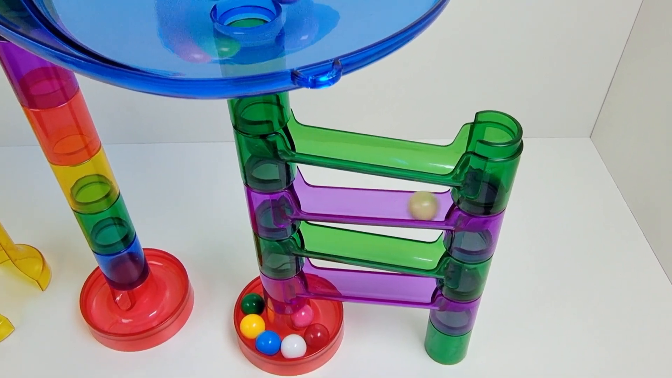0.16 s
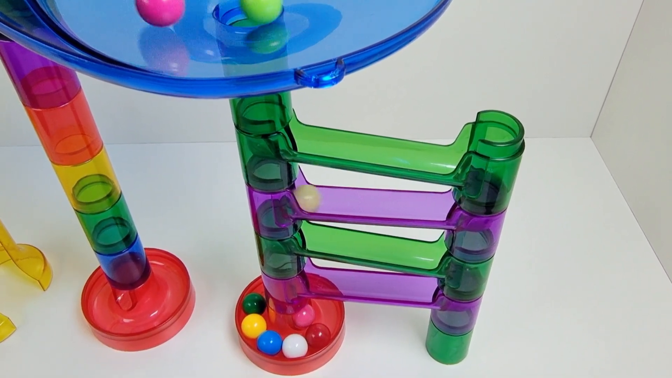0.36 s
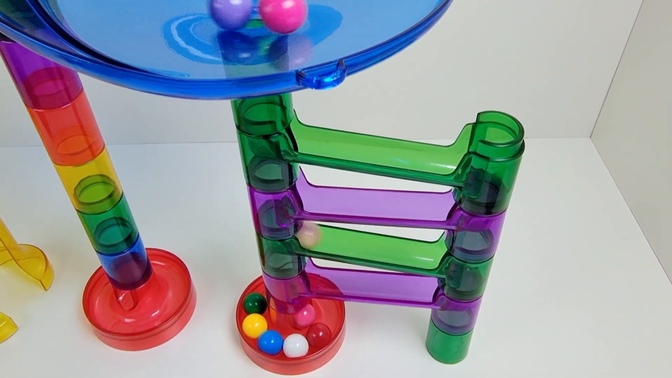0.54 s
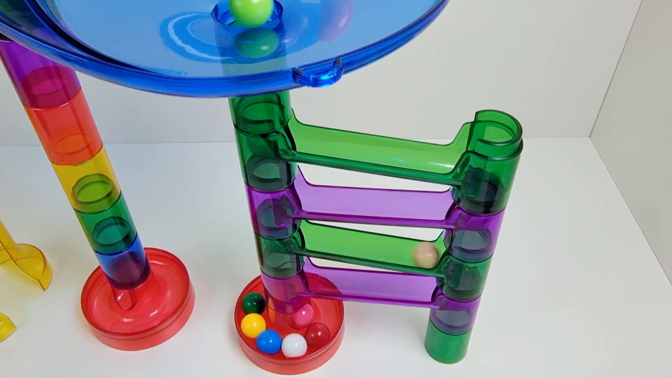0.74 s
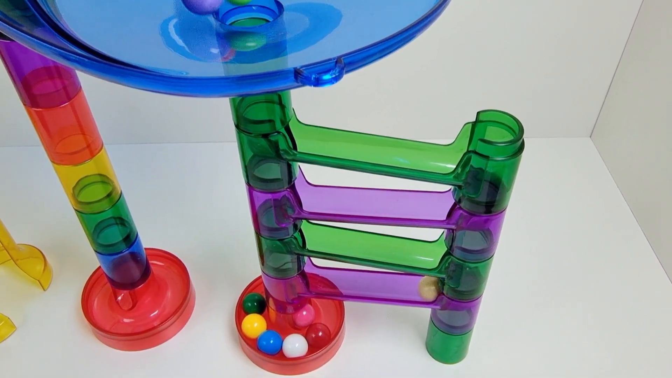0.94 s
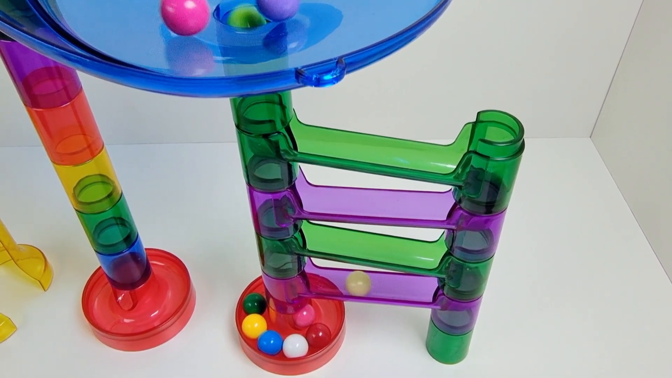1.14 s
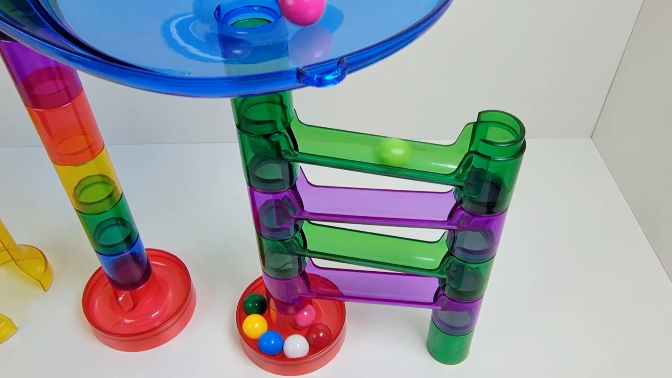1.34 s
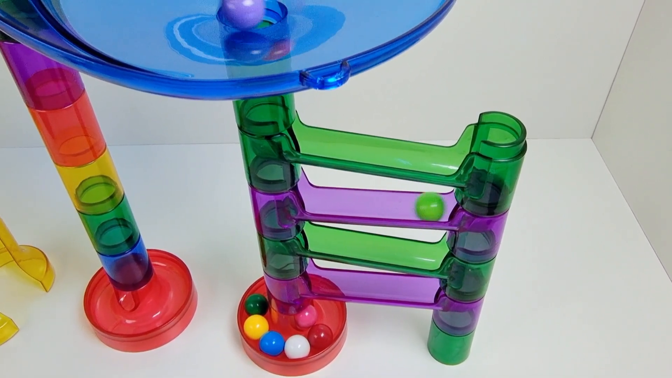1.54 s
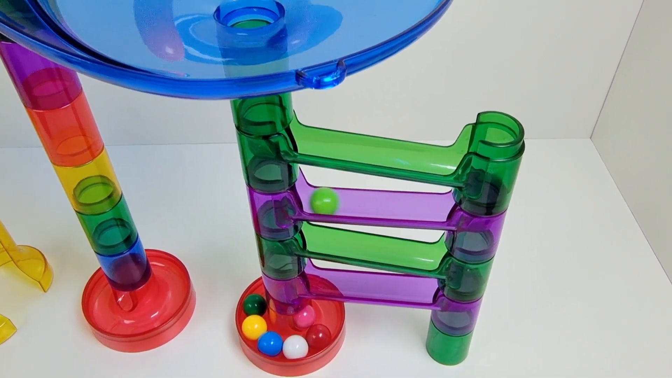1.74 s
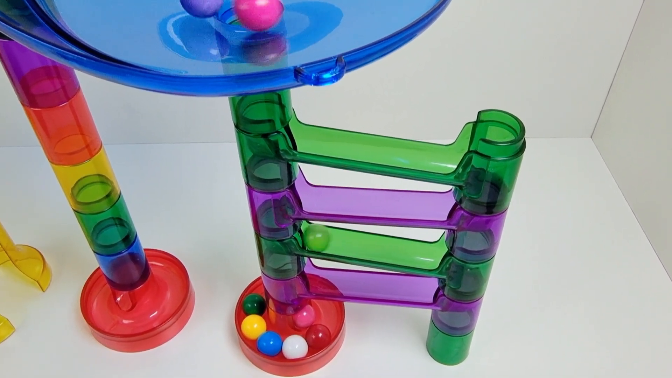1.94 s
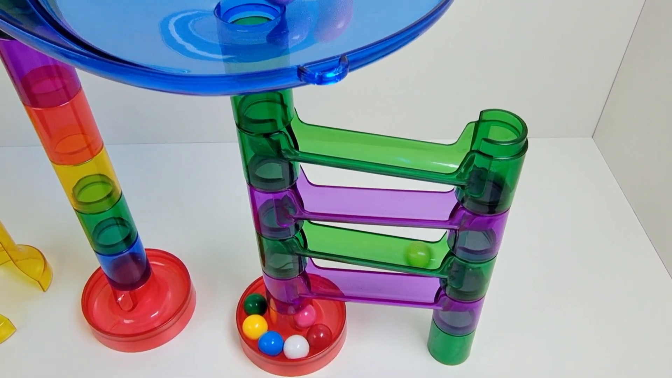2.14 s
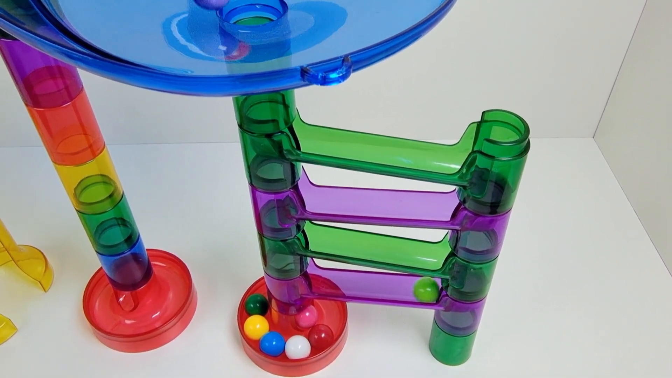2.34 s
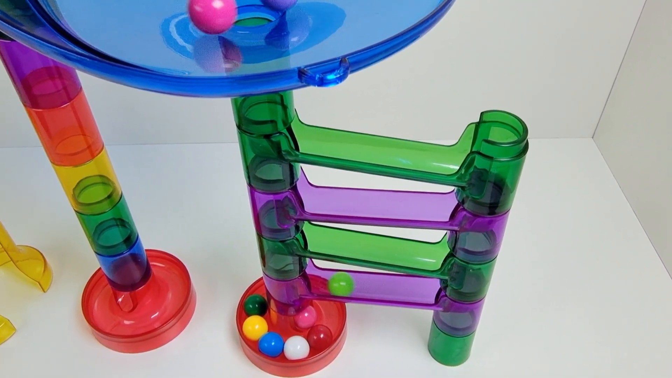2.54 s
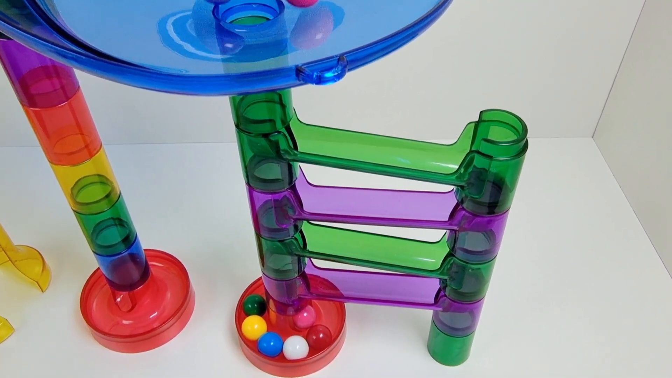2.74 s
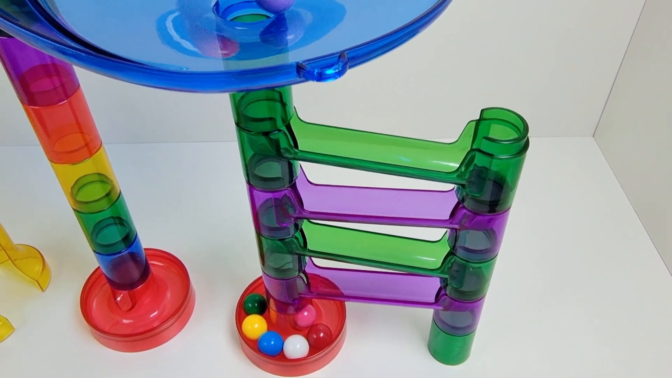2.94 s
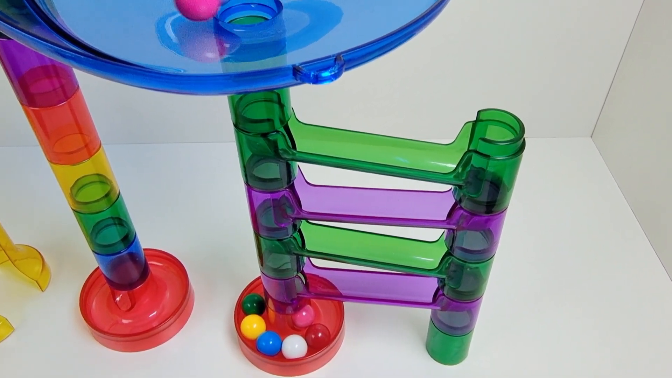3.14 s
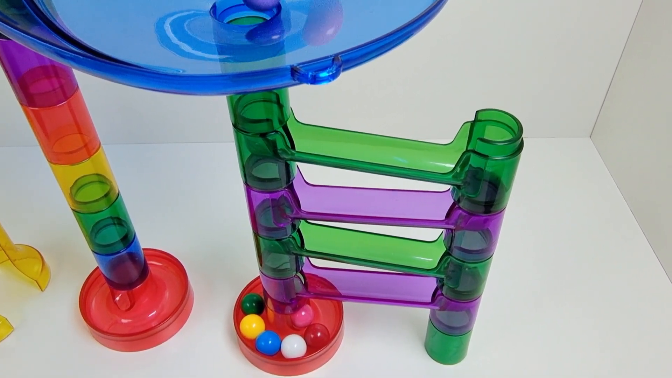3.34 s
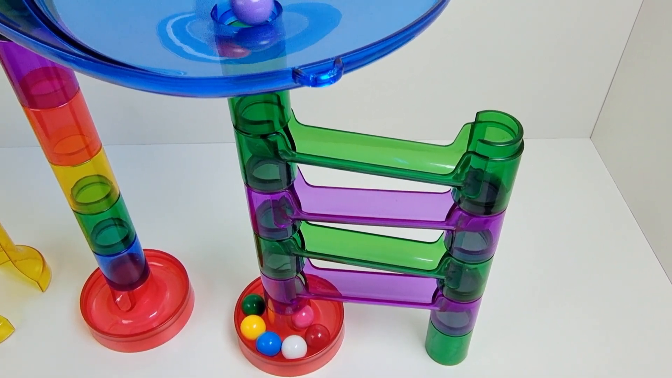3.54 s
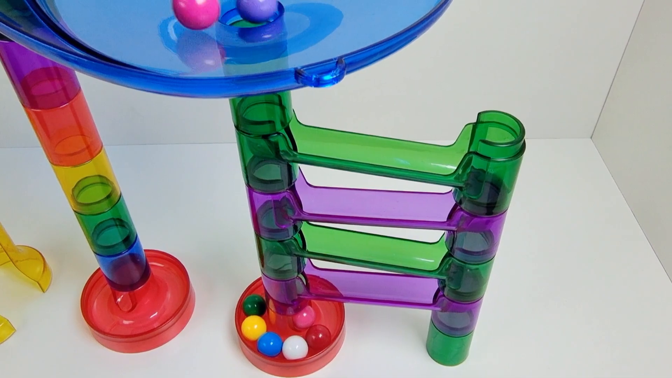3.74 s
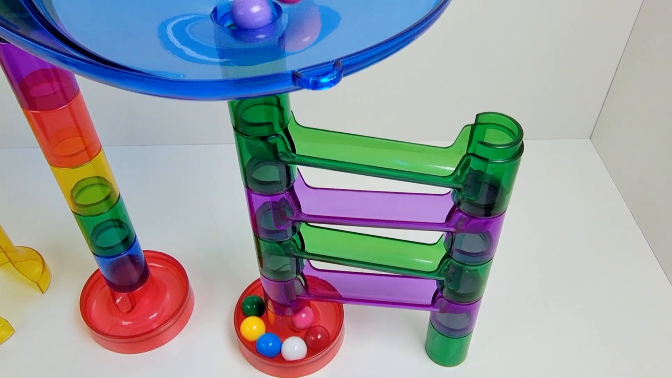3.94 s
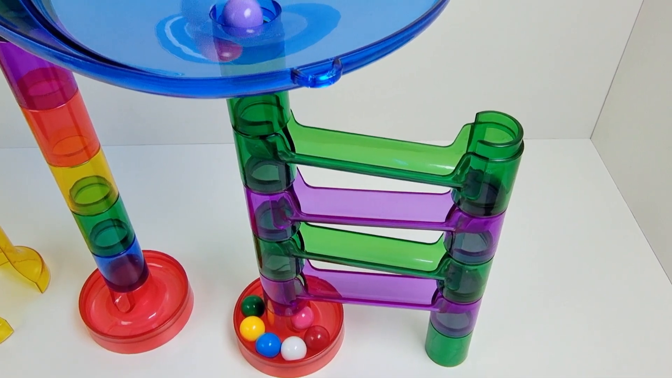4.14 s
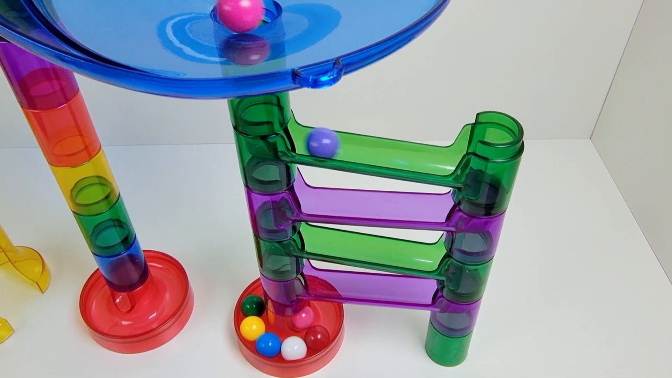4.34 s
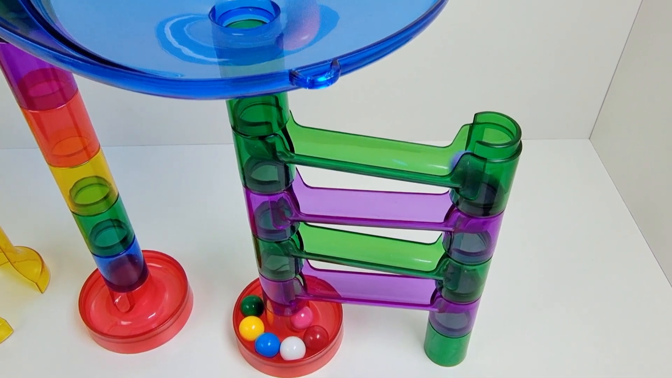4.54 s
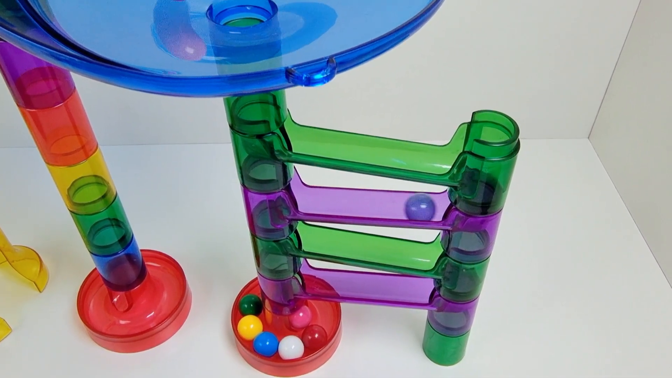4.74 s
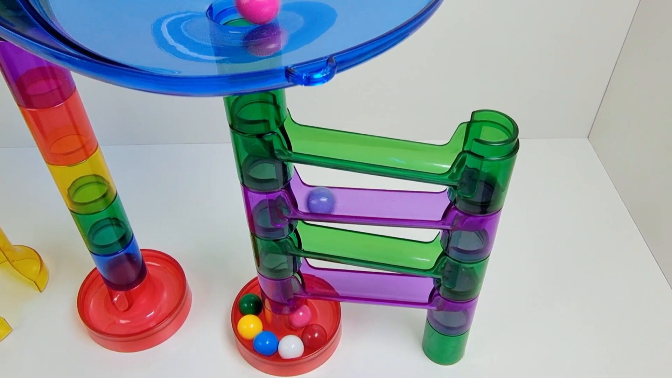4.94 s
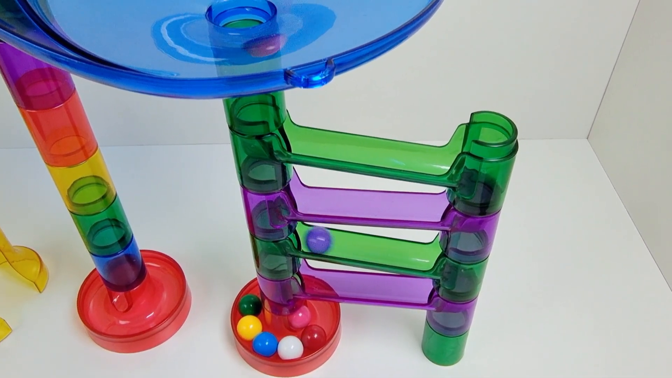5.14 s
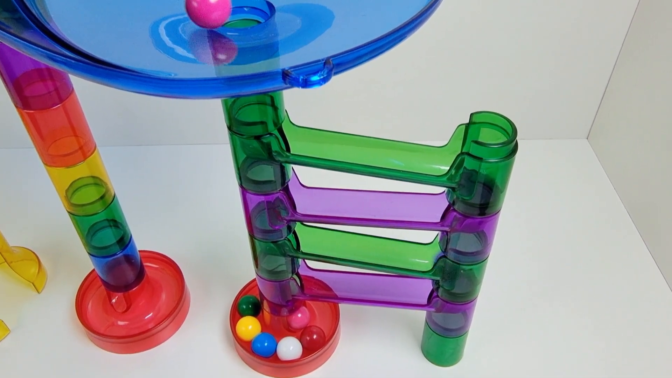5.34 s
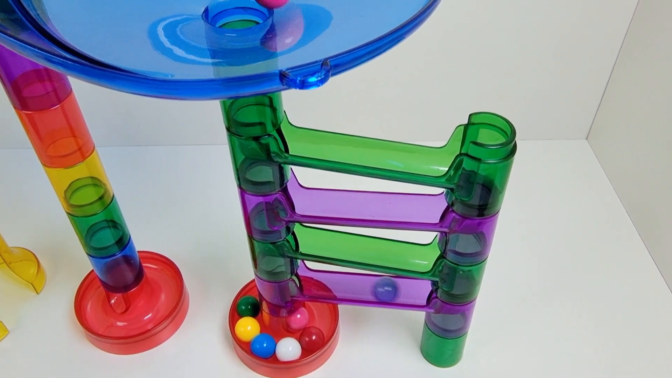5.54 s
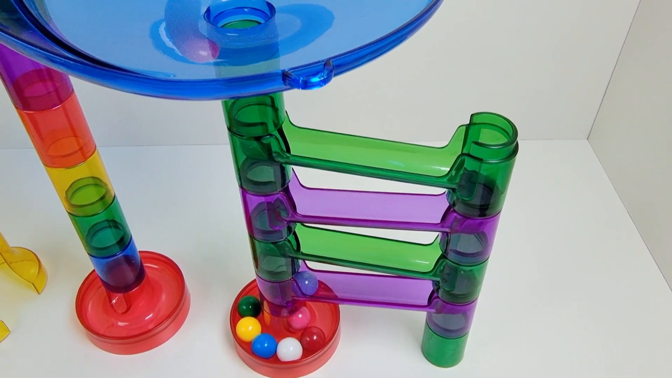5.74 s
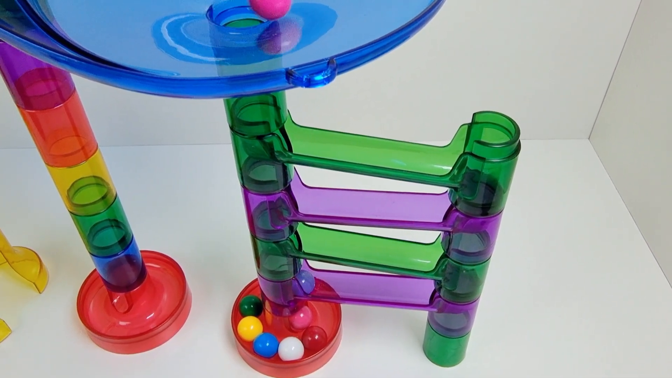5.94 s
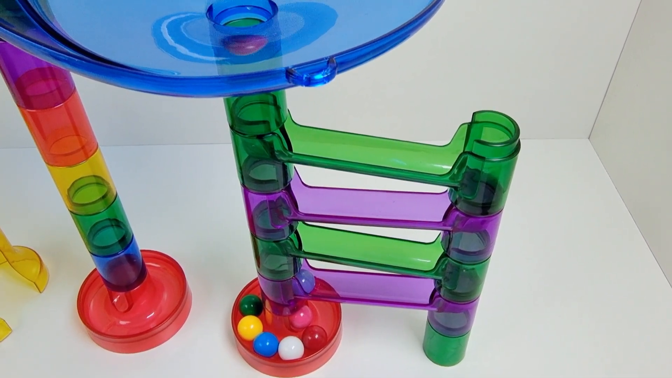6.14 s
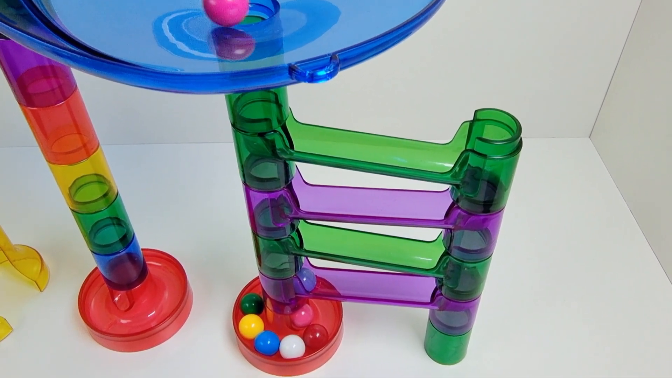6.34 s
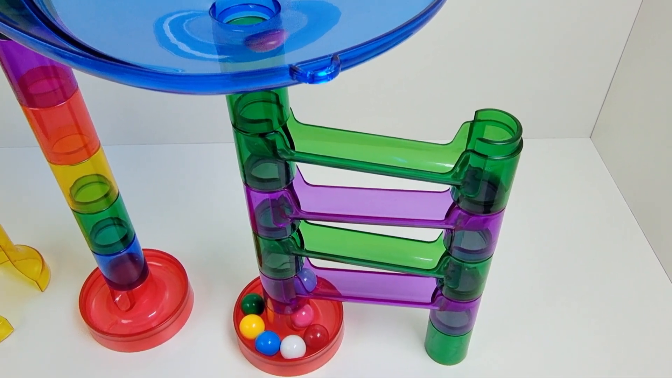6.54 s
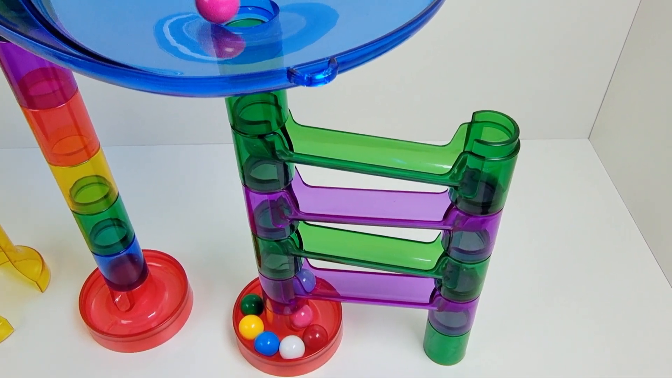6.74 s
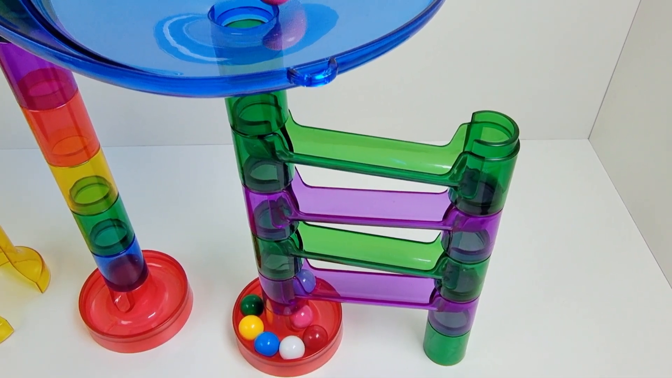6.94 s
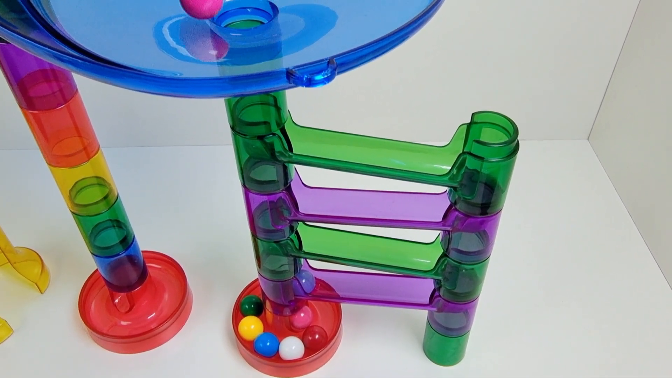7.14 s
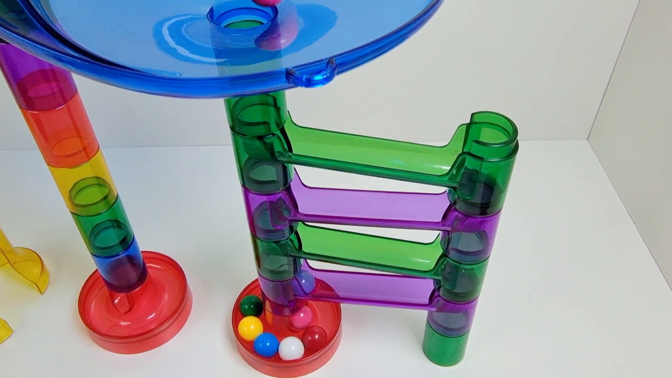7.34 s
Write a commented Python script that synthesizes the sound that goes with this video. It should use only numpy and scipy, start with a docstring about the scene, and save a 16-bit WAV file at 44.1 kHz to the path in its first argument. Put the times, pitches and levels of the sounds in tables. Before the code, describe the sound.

Small hard balls clatter down a plastic toy track from the very start, close by in a small room. Until about 3 seconds, sharp clicks and hollow knocks come in quick bunches, roughly every 0.4 seconds, with rattling and light thumps through the table. Underneath, balls circle a plastic funnel with a soft whirr that swells and sinks. From 3 to about 4.2 seconds the clatter eases, leaving the rolling, light ticks as balls skip over seams, and a couple of small knocks. A second run of clicks and rattles goes down the tubes and ramps from about 4.2 to 5.9 seconds, ending in two soft taps around 6 seconds. After that the funnel whirr turns faint and uneven, with scattered little ticks until about 7.5 seconds. The near walls add a short, dull echo, and a faint low room rumble stays throughout.

```python
"""A table top in a small bare room, two microphones close by. Small hard balls circle a plastic funnel,
drop down tubes and knock along zigzag ramps. Each knock rings the plastic track and thumps the table;
tumbling and rolling balls rattle the same modes. In the funnel, balls whirr over mould marks and skip
on seams, ringing the dish. Near walls add a short, dull tail over the room's low rumble."""
import sys
import numpy as np
from scipy import signal
from scipy.fft import rfft, irfft, next_fast_len
from scipy.io import wavfile
from scipy.ndimage import uniform_filter1d

SR = 44100
rng = np.random.default_rng(int(sys.argv[2]) if len(sys.argv) > 2 else 0)


def materialize(psi):
    """Save the field psi as 16-bit PCM at rate SR to the path in sys.argv[1].

    A 1-D psi becomes a single channel; in a 2-D psi each row is a channel.
    """
    bounded = np.clip(np.atleast_2d(psi).T, -1, 1)
    quanta = np.round(bounded * 32767).astype(np.int16)
    wavfile.write(sys.argv[1], SR, quanta)


N = 330309


def undb(db):
    """Decibels to gain."""
    return 10 ** (np.asarray(db) / 20)


def ring(x, hz, db, t60_s):
    """One decaying mode that radiates nothing far below its pitch."""
    r, w = np.exp(-np.log(1000) / (t60_s * SR)), 2 * np.pi * hz / SR
    return signal.lfilter(undb(db) / 2 * np.array([1, 0, -1]), [1, -2 * r * np.cos(w), r * r], x)


def stereo(three, hz, split_hz=380):
    """Left and right from one common and two private signals: bass shared, treble not."""
    common = 1 / (1 + (hz / split_hz) ** 6)
    return np.sqrt(common) * three[0] + np.sqrt(1 - common) * three[1:]


def grit(per_s, spread_db):
    """Tiny random impacts, many small, few large; three signals with the same timing, rms 1."""
    sizes = (rng.random(N) < per_s / SR) * undb(spread_db * rng.exponential(size=N))
    x = sizes * rng.standard_normal((3, N))
    return x / np.sqrt(np.mean(x ** 2))


def flutter(rate_hz):
    """Random levels joined by straight ramps."""
    step = int(SR / rate_hz)
    return 2 * uniform_filter1d(np.repeat(rng.standard_normal(N // step + 1), step), step)[:N]


# Tumbles. Each row: start in seconds, length in seconds, rattle in dB, table shake in dB.
TUMBLES = [(-0.05, 0.035, -30, -38.5), (0.182, 0.12, -32.5, -36.5), (0.579, .13, -31.5, -37),
           (0.956, 0.17, -38, -36.5), (1.166, 0.4, -36, -42), (1.365, 0.12, -42, -36),
           (1.589, 0.12, -36.5, -32), (1.988, 0.059, -26, -38), (2.397, 0.097, -35, -39),
           (2.794, 0.028, -38.5, -46), (3.855, 0.069, -41, -47), (4.06, .14, -51.5, -53),
           (4.19, 0.13, -40, -43.5), (4.386, 0.093, -31, -40), (4.719, .14, -36, -32.5),
           (5.189, 0.14, -39, -41), (5.512, 0.18, -47, -37), (5.818, 0.032, -35.5, -48)]


def tumbling(t, attack_s=0.0062):
    """Rattle and shake power of balls tumbling down tubes and ramps: quick rise, hold, fade."""
    start_s, length_s, rattle_db, shake_db = np.transpose(TUMBLES)[:, :, None]
    rise = np.clip((t - start_s) / attack_s, 0, 1)
    after_s = np.maximum(t - start_s - length_s, 0)
    rattle = rise * undb(rattle_db - 194.5 * after_s)
    shake = rise * undb(shake_db - 166 * after_s)
    return np.sum(rattle ** 2, axis=0), np.sum(shake ** 2, axis=0)


# Rolling in the funnel, swelling as balls come round. Each row: time in seconds, level in dB.
ROLLING = [(0, -41), (.15, -44), (.55, -40.5), (.82, -41.5), (1.2, -38.5), (1.8, -44), (1.95, -40.5),
           (2.3, -43.5), (2.7, -43.5), (2.8, -40.5), (3.0, -44.5), (3.08, -50.5), (3.15, -43), (3.25, -50),
           (3.55, -45), (3.68, -46.5), (3.75, -46), (3.85, -45), (3.95, -40.5), (4.3, -44.5), (4.7, -43),
           (5.15, -45.5), (5.47, -41), (5.52, -44), (5.8, -46.5), (6.07, -49.5), (6.18, -54.5),
           (6.37, -47.5), (6.5, -69), (6.66, -48), (6.76, -60), (6.86, -55.5), (7.04, -65.5), (7.13, -47.5),
           (7.2, -56.5), (7.27, -60), (7.34, -62), (7.49, -50)]


def ball_motion():
    """Rattle, whirr and table shake in dB: livelier rolling raises all three, tumbles add to them."""
    t = np.arange(0, N / SR + .01, .002)
    roll_db = np.interp(t, *np.transpose(ROLLING))
    tumble_rattle, tumble_shake = tumbling(t)
    rattle = tumble_rattle + undb(-57 + 1.6 * (roll_db + 43)) ** 2
    whirr = tumble_rattle * undb(0.5) ** 2 + undb(roll_db) ** 2
    shake = tumble_shake + undb(-54.5 + 1.3 * (roll_db + 43)) ** 2
    return [np.interp(np.arange(N) / SR, t, 10 * np.log10(power)) for power in (rattle, whirr, shake)]


# Modes of the funnel dish. Each row: frequency in Hz, gain in dB, T60 in seconds.
FUNNEL_MODES = [(190, -17, 0.054), (354, -14.5, 0.012), (623.2, -9, 0.082), (806, 1, 0.0049),
                (1173, -3.5, 0.022), (1430, -8, 0.037), (1481, -0.5, 0.023), (1574, -3, 0.072),
                (1666, -5, .1), (1801, -10, 0.08), (2100, -20, 0.021), (2470, -10, 0.012), (2900, -8, .008),
                (3380, -12, .007), (4130, -26, 0.008), (5000, -26, .015)]


def funnel(whirr_db, smooth_limit_db=-37):
    """Balls whirr over mould marks and skip on seams; both drive the modes of the dish."""
    whirr_db = np.minimum(whirr_db, smooth_limit_db)
    marks = signal.lfilter(*signal.butter(4, 3800, fs=SR), grit(per_s=5000, spread_db=0.73))
    marks *= undb(1.7 * flutter(70) + whirr_db - 24.5)
    brightness = undb(0.79 * (whirr_db + 40))  # a livelier ball scrapes brighter
    skips = seam_skips()
    soft = signal.lfilter(*signal.butter(4, 2400, fs=SR), marks + skips)
    sharp = marks * brightness + skips * undb(4)
    return sum(ring(stereo(sharp if hz > 2300 else soft, hz), hz, db, t60_s)
               for hz, db, t60_s in FUNNEL_MODES)


# Spectrum of the still room. Each row: frequency in Hz, relative density in dB.
RUMBLE_SPECTRUM = [(20, -25.5), (40, -3.5), (58, 6.5), (80, -10), (200, -27), (600, -20), (1600, -18.5),
                   (4000, -50.5), (16000, -70.5)]


def room_rumble(rms_db=-64.5):
    """Steady low noise of the still room."""
    hz = np.maximum(np.fft.rfftfreq(N, 1 / SR), 1)
    point_hz, point_db = np.transpose(RUMBLE_SPECTRUM)
    gain = undb(np.interp(np.log(hz), np.log(point_hz), point_db))
    x = irfft(stereo(rfft(rng.standard_normal((3, N))), hz) * gain, N)
    return x * undb(rms_db) / np.sqrt(np.mean(x ** 2))


def bands(hz):
    """Whether a mode counts as low thump, hollow tube ring or hard contact."""
    return hz < 700, 700 <= hz < 2350, hz > 4800


# Modes of table, tubes and ramps. Each row: frequency in Hz, gain in dB, uncapped T60 in seconds.
TRACK_MODES = [(114.8, -14, 0.12), (164.2, -16, .15), (194.4, -18, 0.13), (257, -17, 0.05),
               (386, -2, 0.014), (531, -6, 0.04), (910, -2.5, 0.0076), (1241.5, -11.5, 0.053),
               (1358, -2.5, 0.02), (1616, 3.5, 0.026), (1630, -8.5, 0.02), (1844, -3.5, 0.039),
               (2055, 3.5, 0.016), (2254, -0.5, 0.015), (2580, -7.5, 0.084), (2736, 5.5, 0.01),
               (2977, 4, 0.0077), (3340, 5.5, 0.0073), (3723, -1, 0.011), (3987, -0.5, 0.017),
               (4442, 1.5, 0.019), (4990, -11, 0.012), (5510, -7.5, 0.0041), (6100, -25, 0.019),
               (7000, -20.5, 0.015), (7500, -26, 0.0033), (10200, -37.5, 0.0036), (12040, -19, 0.0018),
               (13600, -21.5, .003), (14300, -21, .005)]


def track(rattle_db, shake_db, table_below_hz=330, ramp_cycles=50):
    """Rattle and knocks ring one set of modes in the table and the plastic track."""
    loose = loose_joints()
    on_table = np.sqrt(undb(shake_db - 19.5) ** 2 + loose * undb(-56.5))
    on_track = np.sqrt(undb(rattle_db - 36) ** 2 + loose * undb(-50.5))
    rattle = grit(per_s=4000, spread_db=0.71)
    on_track *= undb(2.5 * flutter(120))  # the rattle comes in quick bunches
    out = 0
    for (hz, db, t60_s), blows in zip(TRACK_MODES, knocks()):
        low, tube, hard = bands(hz)
        soft_db = -5 if tube or hard else 0  # small bounces favour the middle modes
        rattle_gain = on_table if hz < table_below_hz else on_track * undb(soft_db)
        if not (low or tube):
            t60_s = min(t60_s, ramp_cycles / hz)  # thin ramps soak up the ring
        out += ring(stereo(rattle, hz) * rattle_gain + blows, hz, db, t60_s)
    return out


# Knocks on the track. Each row: start in seconds, blow in dB, hollow tube ring in dB, hard contact in dB.
KNOCKS = [(0.0398, -45, 8, -5), (0.1904, -7.5, -6.5, -2), (0.208, -30, -4, 21), (0.2202, -20.5, -9, 10),
          (0.2319, -16, -11, 5), (0.26, -17, -1.5, 4), (0.3, -23.5, -13, 5.5), (0.3391, -22, -3, 9.5),
          (0.462, -44, 13, -14), (0.5863, -7.5, -9.5, 3), (0.605, -26.5, 7.5, 10.5),
          (0.635, -32.5, 7, 10.5), (0.6727, -17.5, 6.5, 9), (0.7118, -28, 6.5, 7), (0.7494, -21.5, 2, 13.5),
          (0.963, -7, -7.5, 1.5), (1.0293, -9, -8.5, -13.5), (1.0494, -27, 1.5, 1), (1.0591, -16.5, -3, 4),
          (1.107, -14, -12, 3.5), (1.1424, -23, -1.5, 10), (1.1856, -29, 0, 2), (1.2014, -27.5, -3, -10),
          (1.2211, -29, -8, -8.5), (1.2812, -31.5, 2, 10), (1.3087, -24.5, 1.5, 13.5),
          (1.321, -28.5, -11, -5), (1.3431, -27, -2, 13), (1.3612, -17, 1, 0.5), (1.3698, -7, -15.5, 8),
          (1.3958, -15, 4.5, 10.5), (1.4464, -12.5, 4, 8), (1.4616, -10, -16.5, 3),
          (1.473, -23.5, 7.5, -4.5), (1.5088, -14.5, 1, 16.5), (1.5937, -10, -3, 6), (1.6417, -7, -10, 1.5),
          (1.653, -14.5, -0.5, -8), (1.668, -12.5, -12, 9), (1.705, -27, 0, 12), (1.9481, -36, 1, 5),
          (1.9903, -8, -9, -0.5), (2.005, -25, 3.5, 4), (2.0185, -25, -4, 19), (2.0508, -16.5, 3.5, 5),
          (2.0856, -30, -10.5, 14.5), (2.1268, -19.5, 1, 10), (2.267, -41, -1, 2), (2.323, -46.5, -2, 18),
          (2.356, -40, 0, 5), (2.388, -7, -10.5, -3), (2.415, -23, 0, 7), (2.4381, -14, -3, 4),
          (2.4849, -14.5, -8, 8), (2.52, -21.5, 0.5, 9), (2.5873, -33.5, -12, 5), (2.703, -41.5, 5, 6),
          (2.801, -16.5, -3, 8), (2.8253, -16, -1.5, 8), (2.8676, -38, 6, -1), (2.9638, -33, -4, 8),
          (3.0025, -34, 4.5, 9), (3.4202, -50, 7, 15), (3.876, -29, -0.5, 0), (3.9488, -36.5, -3.5, -4),
          (4.1953, -40.5, 4.5, -5), (4.2272, -32.5, -5, -13.5), (4.2704, -34, 1, -3.5),
          (4.3212, -32, -4, 14), (4.3345, -26.5, -2, 12), (4.358, -23.5, 0, 10), (4.382, -12.5, -1.5, 5),
          (4.392, -5, -14.5, 5.5), (4.4035, -28, 15, 18.5), (4.425, -18, -4.5, 9), (4.472, -21, 3, 14),
          (4.5067, -20, 2, 12), (4.7266, -8, -5, -4.5), (4.7709, -15, -14, 5), (4.7877, -22, -12, 6.5),
          (4.806, -13.5, -5.5, 2.5), (4.8431, -16, -21, 9.5), (4.869, -23, 0, 7), (5.1096, -43, 0, -11),
          (5.1968, -8, -7, 6), (5.2108, -31, 3, 2), (5.2234, -24, -4, 7), (5.2495, -17.5, 5, 6),
          (5.2844, -17.5, 3.5, 9.5), (5.3142, -23.5, -3.5, 9.5), (5.5267, -7.5, -14, -3.5),
          (5.544, -22.5, 2.5, 13), (5.5809, -17, -11, -3), (5.6182, -15, -1.5, -6), (5.657, -22.5, -4, 7),
          (5.699, -30, -5.5, 0), (5.73, -36, 6, 2), (5.757, -36.5, 0, 10), (5.8279, -21, -1.5, 14),
          (5.8413, -28, 5.5, 8), (5.8596, -14, -5, 1.5), (5.903, -27.5, -2.5, -7), (6.0005, -34.5, 0, -15),
          (6.0377, -30.5, 0, -12), (7.4456, -42, 4, -9)]


def knocks(samples=600):
    """A ball chatters on the wall, longer for a softer blow. Yields the drive of each track mode."""
    start_s, blow_db, hollow_db, bright_db = np.transpose(KNOCKS)
    thump_db = -21 - 0.37 * blow_db  # hard hits are mostly click
    t = np.arange(samples) / SR
    at = np.minimum((start_s * SR).astype(int)[:, None] + np.arange(samples), N - 1)
    chatter_ms = np.clip(1.2 - .04 * blow_db, .4, 5)[:, None]
    short = (1 - np.exp(-t / 0.00044)) * np.exp(-1000 * t / chatter_ms)
    short /= np.sqrt(np.sum(short ** 2, axis=1, keepdims=True))
    long = np.sqrt(short / np.sum(short, axis=1, keepdims=True))  # decays half as fast
    fizz = long * rng.standard_normal((3, len(KNOCKS), samples))
    pan_db = 0.5 * rng.standard_normal((len(KNOCKS), 1))
    pan = undb(np.array([pan_db, -pan_db]) / 2)
    for hz, _, _ in TRACK_MODES:
        low, tube, hard = bands(hz)
        # each blow lands elsewhere and weights the modes anew
        scatter_db = (1.2 if low else 3.0) * rng.standard_normal(len(KNOCKS))
        colour_db = low * thump_db + tube * hollow_db + hard * bright_db + scatter_db
        # a mode takes the chatter at its own pitch; the crowded treble takes noise
        tone = 0.13 * np.cos(2 * np.pi * (hz * t + rng.standard_normal((3, len(KNOCKS), 1))))
        contact = fizz if hard else (1.2 * long if low else short) * tone
        drive = np.zeros((2, N))
        drive[:, at] = stereo(contact, hz) * pan * undb(blow_db + colour_db - 1)[:, None]
        yield drive


def loose_joints(decay_s=0.0097):
    """Power of the rattle left in the track's loose joints after each knock."""
    start_s, blow_db = np.transpose(KNOCKS)[:2]
    jolts = np.zeros(N)
    jolts[(start_s * SR).astype(int)] = undb(blow_db - 17.5) ** 2
    return signal.lfilter([1], [1, -np.exp(-1 / (decay_s * SR))], jolts)


# Skips on the funnel's seams. Each row: start in seconds, level in dB.
SEAM_SKIPS = [(3.0683, -24), (3.0909, -36), (3.1155, -41), (3.1433, -28.5), (3.2776, -31), (3.4206, -28.5),
              (3.479, -43), (3.5358, -26), (3.6058, -33.5), (3.6563, -32), (3.686, -40), (3.7747, -41),
              (3.8157, -44), (6.237, -32), (6.257, -39.5), (6.2887, -39.5), (6.3392, -40), (6.3824, -42.5),
              (6.4106, -44.5), (6.563, -43), (6.6079, -50), (6.6583, -36.5), (6.7196, -39.5),
              (6.7994, -40.5), (6.842, -39.5), (6.906, -47), (6.94, -44), (7.1232, -40), (7.1404, -45),
              (7.2654, -39.5), (7.354, -39.5)]


def seam_skips(decay_ms=2.9, samples=900):
    """A ball crossing a seam scuffs the dish with a short burst of noise."""
    start_s, level_db = np.transpose(SEAM_SKIPS)[:, :, None]
    t = np.arange(samples) / SR
    envelope = np.sqrt(t / t[-1]) * np.exp(-1000 * t / decay_ms) * undb(level_db - 18)
    at = (start_s * SR).astype(int) + np.arange(samples)
    scuffs = np.zeros((3, N))
    scuffs[:, at] = envelope * rng.standard_normal((3, *at.shape))
    return signal.lfilter(*signal.butter(2, 4500, fs=SR), scuffs)


def room_echo(x, level_db=-8, t60_s=0.27, dull_hz=5560, build_s=0.011):
    """Near walls add a dense, dull tail, different at each microphone."""
    t = np.arange(SR // 2) / SR
    tail = rng.standard_normal((3, len(t))) * np.exp(-np.log(1000) * t / t60_s)
    tail *= np.minimum(t / build_s, 1)
    tail = signal.lfilter(*signal.butter(1, dull_hz, fs=SR), tail / np.sqrt(np.sum(tail[0] ** 2)))
    size = next_fast_len(N + len(t))
    response = stereo(rfft(tail, size), np.fft.rfftfreq(size, 1 / SR))
    return x + undb(level_db) * irfft(rfft(x, size) * response, size)[:, :N]


def scene():
    """Track and funnel in the room, over its rumble."""
    rattle_db, whirr_db, shake_db = ball_motion()
    toy = track(rattle_db, shake_db) + funnel(whirr_db)
    # the toy's sound carries no deep bass
    toy = signal.sosfilt(signal.butter(4, 102, "high", fs=SR, output="sos"), toy)
    return room_echo(toy) + room_rumble()


def record(dry, top_hz=15750):
    """Right microphone a little brighter. The treble is softened near 10 kHz; peaks rounded, top cut."""
    sheen = signal.sosfilt(signal.butter(2, 11000, "high", fs=SR, output="sos"), dry)
    treble = signal.sosfilt(signal.butter(1, [8000, 12000], "band", fs=SR, output="sos"), dry)
    softened = dry + np.array([[-.35], [.35]]) * sheen - .5 * treble
    rounded = np.tanh(0.94 * softened) / 0.83
    return signal.sosfilt(signal.ellip(12, .2, 100, top_hz, fs=SR, output="sos"), rounded)


dry = scene()
out = record(dry)
materialize(out)
```